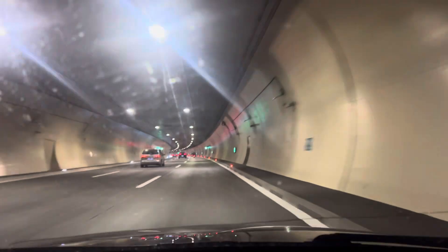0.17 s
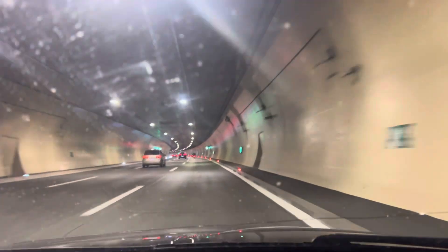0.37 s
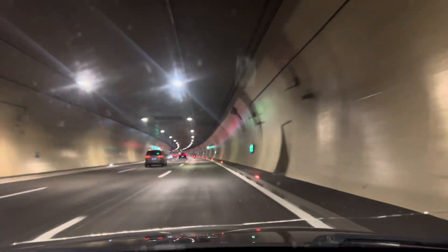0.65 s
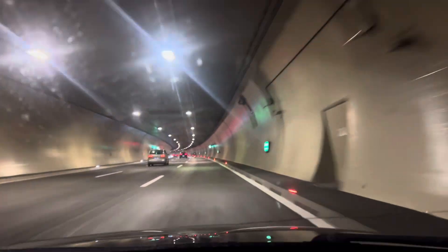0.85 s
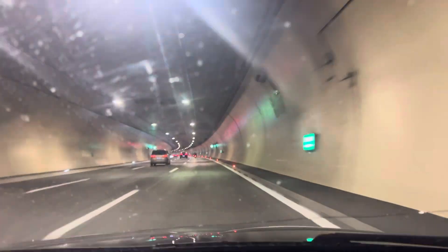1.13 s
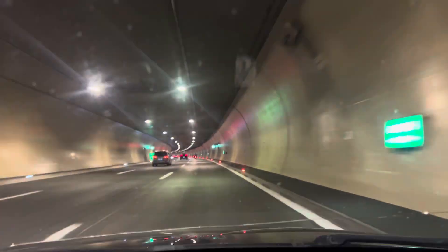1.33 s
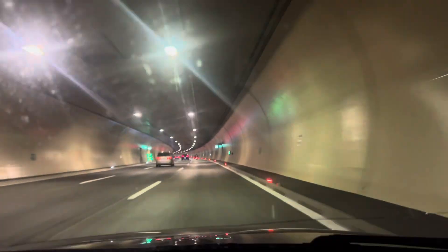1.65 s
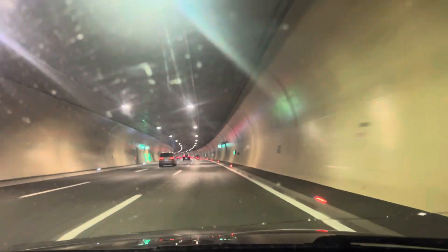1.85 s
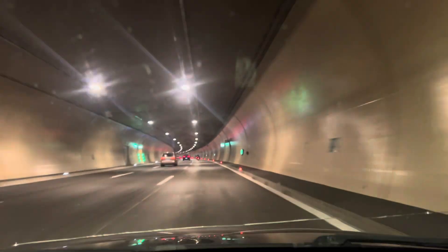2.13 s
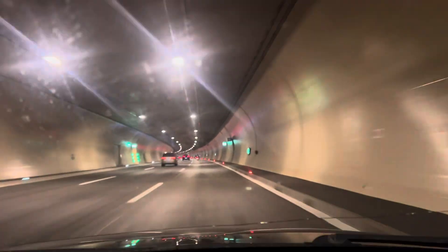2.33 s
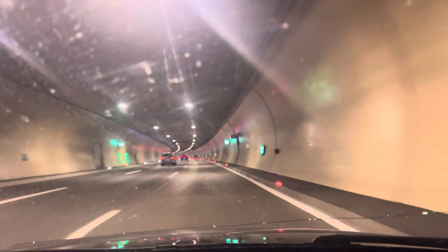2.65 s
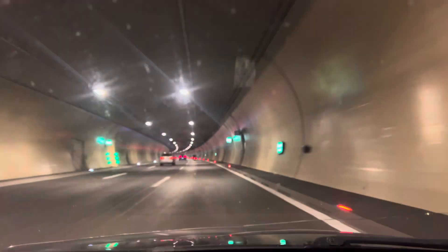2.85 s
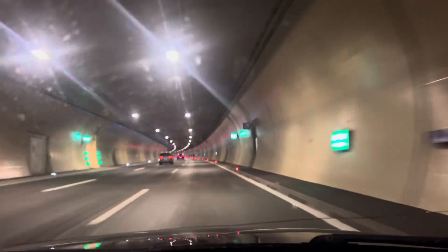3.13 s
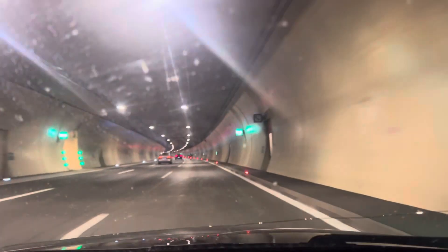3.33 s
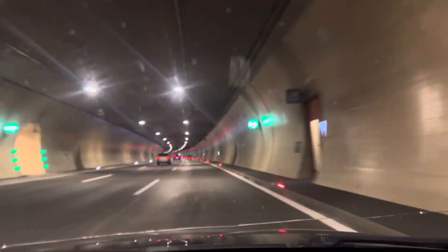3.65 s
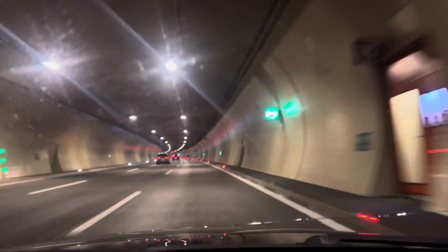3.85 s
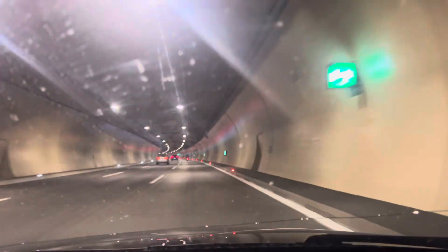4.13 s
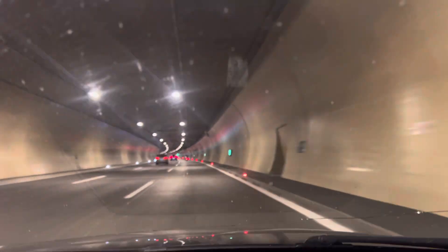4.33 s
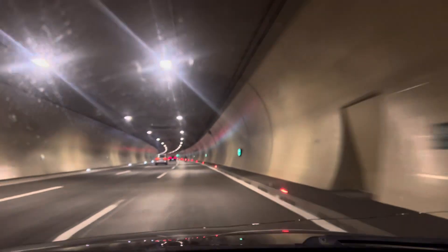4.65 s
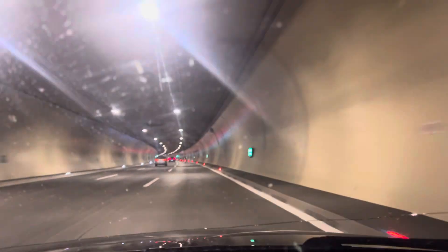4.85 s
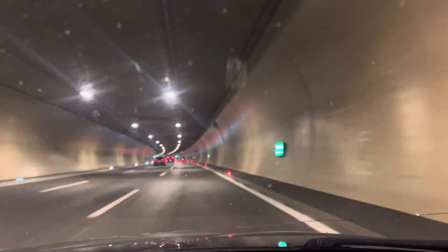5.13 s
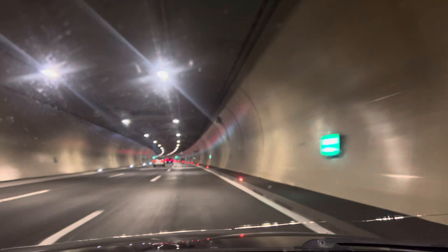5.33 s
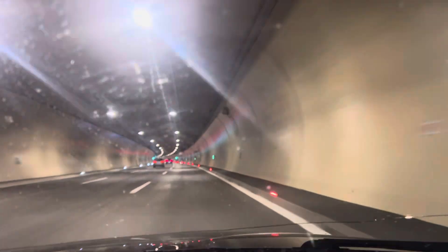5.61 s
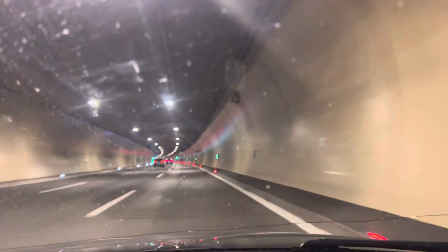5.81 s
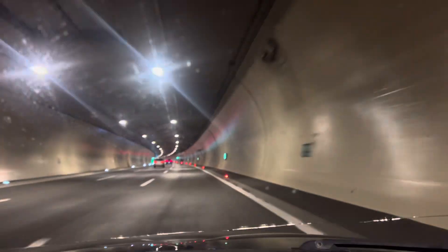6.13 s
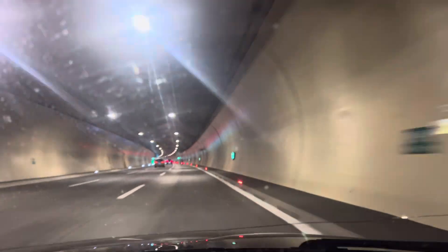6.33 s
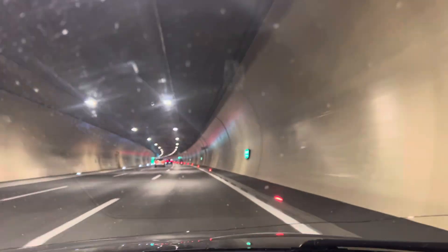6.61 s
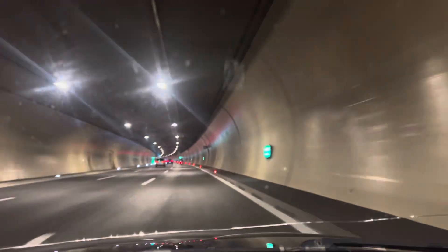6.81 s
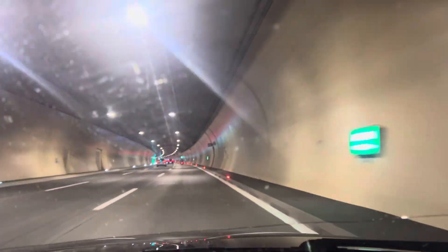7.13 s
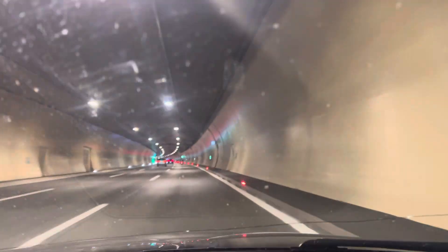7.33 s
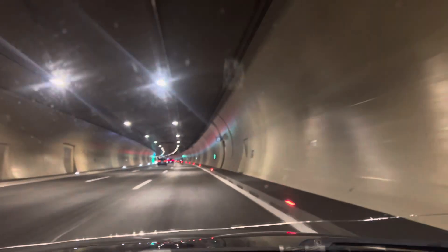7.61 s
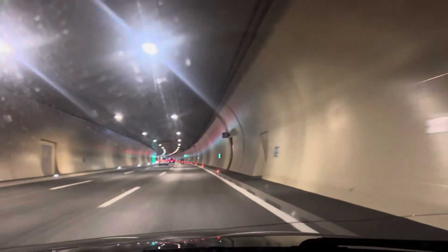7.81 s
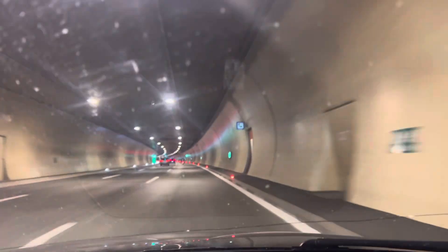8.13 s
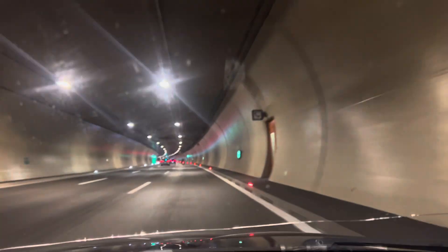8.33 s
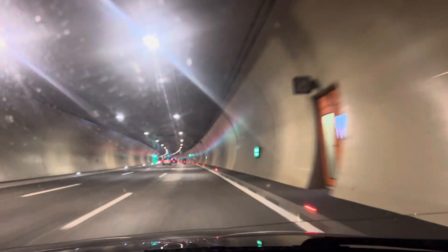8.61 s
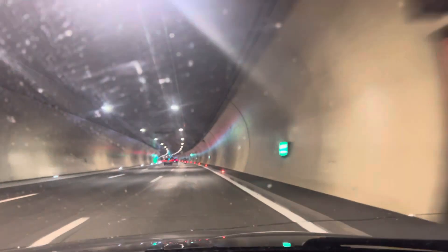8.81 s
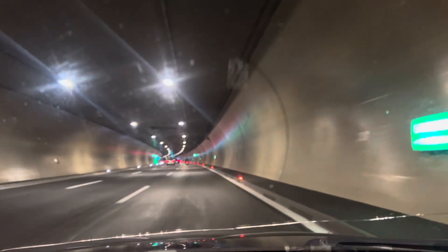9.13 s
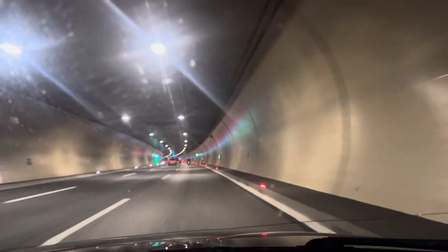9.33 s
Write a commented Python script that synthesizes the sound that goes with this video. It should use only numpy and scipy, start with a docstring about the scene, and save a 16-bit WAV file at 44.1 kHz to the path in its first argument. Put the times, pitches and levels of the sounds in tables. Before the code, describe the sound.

A continuous car interior rumble at cruising speed, close and boxy, dominated by deep humming boom. The road shakes it irregularly: dull double thumps, short floor growls, small swells. Tyre roar thrown back by tunnel walls sits behind as steady mid-range noise with a slightly wavering groove tone, and faint wind hiss at the window seals. The middle is smoother, with a few more bumps near the end; the speed barely changes.

```python
"""Car cruising through a long road tunnel

Heard from a phone behind the windscreen. Road shake is noise shaped into a low cabin drone, with sine orders
of wheels and engine humming in it; bumps are short decaying rings and rough strips are bursts of low growl.
Tread roar, thrown back by the tunnel walls, is resonant noise with a wavering groove tone.
Air along the window seals is a gusty high hiss."""
import sys
import numpy as np
from scipy import signal
from scipy.fft import rfft, irfft
from scipy.io import wavfile
from scipy.ndimage import uniform_filter1d, minimum_filter1d, map_coordinates

SR = 44100
rng = np.random.default_rng(int(sys.argv[2]) if len(sys.argv) > 2 else 0)


def wav_out(sig):
    """Save sig, one row per channel (or a flat mono array), as 16-bit PCM at SR to the path in sys.argv[1]."""
    wavfile.write(sys.argv[1], SR, np.round(np.clip(np.atleast_2d(sig).T, -1, 1) * 32767).astype(np.int16))


N = 417186  # length in samples

GEAR = 2.76  # crank turns per wheel turn


def undb(db):
    """Decibels to gain."""
    return 10 ** (np.asarray(db) / 20)


def bins():
    """Frequency of each spectral bin in Hz, kept at 1 or more for the logarithms."""
    return np.maximum(np.arange(N // 2 + 1) * SR / N, 1)


def across(table):
    """The columns of a frequency table, interpolated over log frequency to one value per bin."""
    hz, *columns = np.transpose(table)
    return [np.interp(np.log(bins()), np.log(hz), column) for column in columns]


def curve(table):
    """A timed table, one value per sample."""
    return np.interp(np.arange(N) / SR, *np.transpose(table))


def humps(times, sizes, half_s):
    """A bell-shaped change around each time, down to 1/e of its size half_s away from the middle."""
    t = np.arange(N) / SR
    return sum(size * np.exp(-((t - middle) / half_s) ** 2) for middle, size in zip(times, sizes))


def walk(rate):
    """Smooth random wander of spread 1 that moves about rate times a second."""
    spectrum = rfft(rng.standard_normal(N)) * np.exp(-(bins() / rate) ** 2)
    wander = irfft(spectrum, N)
    return wander / wander.std()


def colour(shape, resonances):
    """Gain per bin: a broad shape with steep skirts, lifted or dipped at each resonance."""
    skirt_db = -36  # fall per octave outside the range of the shape
    octaves_outside = np.abs(np.log2(bins() / np.clip(bins(), shape[0][0], shape[-1][0])))
    lifts = sum(db / (1 + (2 * (bins() - hz) / width) ** 2) for hz, width, db in resonances)
    return undb(across(shape)[0] + lifts + skirt_db * octaves_outside)


def cabin_noise(shape, resonances=()):
    """Coloured noise at both ports, their mean at rms 1; standing waves set likeness, lag and balance."""
    # cabin field at the two ports: frequency_hz, coherence (0-1), left_leads_rad, left_minus_right_db
    ports = [(40.0, 0.9, 1, -0.5), (138, 0.98, 0.03, -2.3), (178, 0.79, -1, 0), (264, 0.86, -0.14, 1.5),
             (357, 0.82, -0.7, -4.5), (447, 0, 3.5, 5.5), (546, 0.03, -1, -4), (653, 0.88, 3, -3),
             (880, 0.25, 2, -1), (1070, 0.46, 1, -2), (1690, 0.21, 0.25, -0.5), (2800.0, 0.03, 0, 0),
             (3900, 0.4, 1.5, 3.5), (5400.0, 0.03, 0, 9.5), (7200.0, 0.02, 0, 0)]
    likeness, lead, tilt_db = across(ports)
    likeness = np.clip(likeness, 0, 1)
    shared, own = rfft(rng.standard_normal((2, N)))
    partner = likeness * np.exp(-1j * lead) * shared + np.sqrt(1 - likeness ** 2) * own
    left_gain, right_gain = undb(tilt_db / 2), undb(-tilt_db / 2)
    # dividing by the size of the two ports' sum keeps the colour true in their mean
    centre = np.sqrt(left_gain ** 2 + right_gain ** 2 + 2 * likeness * np.cos(lead))
    spectra = np.array([left_gain * shared, right_gain * partner])
    noise = irfft(spectra * colour(shape, resonances) / centre, N)
    return noise / noise.mean(axis=0).std()


def steady(y):
    """Levels out slow swells to a running rms of 1; quicker throbs stay."""
    window_s = .25
    power = uniform_filter1d(y.mean(axis=0) ** 2, int(window_s * SR))
    return y / np.sqrt(power)


def orders(turn_hz, table, waver_db, slip):
    """Sines on whole and half multiples of a shaft speed, wavering in level and phase; rms 1."""
    angle = 2 * np.pi * np.cumsum(turn_hz) / SR
    y = 0
    for multiple, db in table:
        drift = slip * walk(.8) + rng.uniform(0, 2 * np.pi)  # rad
        size = undb(db + waver_db * walk(1.5))
        nearest_half = round(2 * multiple) / 2
        y = y + size * np.sin(nearest_half * angle + drift)
    return y / y.std()


def road_hum(wheel_hz):
    """Out-of-round tyres and engine shake through the mounts hum at multiples of their shaft speeds."""
    # out-of-round tyres: wheel_turn_multiple, relative_level_db
    wheel_orders = [(8, 0), (16, -23)]
    # how strongly the tyres hum in the drone: start_s, level_db
    tyre_hum = [(0, -5.5), (.75, -3), (1.8, -7), (2.5, -2.5), (3.3, -3.5), (4.1, 0), (4.9, -3), (5.8, -2.5),
                (6.8, -5), (8.1, -7), (9.0, -3), (9.46, -5.5)]
    # engine shake that comes through the mounts: crank_turn_multiple, relative_level_db
    mount_orders = [(2.5, -3), (3, -6.5), (3.5, -2), (4, -8.5)]
    mount_db = -5  # engine shake re drone noise
    tyres = orders(wheel_hz, wheel_orders, waver_db=1, slip=.2) * undb(curve(tyre_hum))
    mounts = orders(GEAR * wheel_hz, mount_orders, waver_db=2.5, slip=0.7) * undb(mount_db)
    return (tyres + mounts) * undb([[-.6], [.6]])  # a little stronger on the right


def road(wheel_hz, shake_db):
    """Road shake booms in the cabin with the hum in it; coarse asphalt rumbles in the floor."""
    # cabin boom under road shake: frequency_hz, relative_level_db
    drone_shape = [(68, -14), (85, -7), (98, -1), (110, -3.5), (124, 0), (139, 2.5), (153, -1.5),
                   (175, -7.5), (220, -18.5)]
    # floor panels and tyre cavities: frequency_hz, relative_level_db
    panels = [(150, -14), (186, 1.5), (235, -2.5), (262, -6.5), (288, -5), (315, -10), (345, -8.5),
              (362, -9), (400, -15), (450, -23.5)]
    # uneven patches in the road: middle_s, drone_lift_db, rumble_lift_db
    patches = [(.2, 1, 1.5), (.74, 5, -1.5), (1.19, 4.5, -1), (1.42, 3, 2), (2.24, 2, -2), (2.52, 0.5, 1),
               (2.74, 1.5, -0.5), (3.25, -1, 0), (3.58, 0.5, 2), (3.93, -0.5, 1), (4.36, 0, 0.5),
               (4.55, -1, 1), (4.82, 1.5, 3.5), (5.86, -1, -1), (8.52, 0, 2), (8.76, -2.5, 1.5),
               (9.04, 2, -0.5)]
    patch_s = 0.099  # from the middle of a patch to 1/e of its lift
    drone_db, smooth_road_db = 0.44, -18  # drone re road shake; shake on ordinary asphalt
    rumble_base_db, rumble_follow = -26.5, 0.11  # rumble on ordinary asphalt; dB per dB of extra shake
    drone = steady(cabin_noise(drone_shape) + road_hum(wheel_hz))
    rumble = steady(cabin_noise(panels))
    times, drone_lifts, rumble_lifts = np.transpose(patches)
    drone_level = drone_db + shake_db + humps(times, drone_lifts, patch_s)
    rumble_level = rumble_base_db + rumble_follow * (shake_db - smooth_road_db)
    rumble_level = rumble_level + humps(times, rumble_lifts, patch_s) + 0.28 * walk(5)
    return drone * undb(drone_level) + rumble * undb(rumble_level)


def bumps():
    """Each bump kicks the body through the suspension; it rings briefly, alike at both ports."""
    # bumps that thud: peak_s, peak_db, ring_hz
    thuds = [(0.024, -9.5, 115), (0.701, -9, 120), (1.139, -8.5, 116), (2.026, -4.5, 111),
             (2.215, -6, 128.5), (2.264, -5, 137), (2.352, -8, 127), (2.591, -9, 121), (2.758, -5.5, 126),
             (3.04, -7, 122), (3.259, -9, 126), (4.025, -6.5, 120), (4.135, -5, 118.3), (4.45, -9, 124),
             (4.709, -3.5, 125), (4.795, -9.5, 127), (4.959, -9, 137), (5.85, -13, 125), (6.015, -10, 128),
             (8.455, -8.5, 119), (8.54, -9, 120), (8.96, -9, 119), (9.056, -10, 129), (9.124, -10, 132)]
    rise_s, decay_s = .012, 0.015  # to 1/e of the peak, before and after it
    t, y = np.arange(N) / SR, 0
    phases = rng.uniform(0, 2 * np.pi, len(thuds))
    for (peak_s, db, hz), phase in zip(thuds, phases):
        since = t - peak_s
        envelope = np.exp(-(np.minimum(since, 0) / rise_s) ** 2 - np.maximum(since, 0) / decay_s)
        y = y + undb(db) * envelope * np.sin(2 * np.pi * hz * since + phase)
    return y


def strips():
    """The floor growls briefly as the tyres cross a rough strip: low noise under bell-shaped bursts."""
    # short rough strips: middle_s, level_db
    crossings = [(.48, -38), (1.04, -28), (1.69, -28), (1.83, -25.5), (2.22, -28), (2.361, -27.5),
                 (3.87, -28), (3.98, -22), (4.23, -25.5), (4.38, -27), (6.0, -27), (9.32, -29)]
    # their growl in the floor: frequency_hz, relative_level_db
    growl = [(180, 5.5), (260, 0.5), (360, -8), (450, -14.5), (560, -9.5), (700, -17.5)]
    strip_s = 0.045  # from the middle of a strip to 1/e of its growl
    times, db = np.transpose(crossings)
    return cabin_noise(growl) * humps(times, undb(db), strip_s)


def engine(wheel_hz):
    """The engine's low orders ride on the sway of the shell; the boom sinks and swells now and then."""
    # engine: crank_turn_multiple, relative_level_db
    engine_orders = [(1, -1), (1.5, -5)]
    # the shell swaying on its springs: frequency_hz, relative_level_db
    sway_shape = [(18, -26), (28, -20), (36, -5), (48, 2), (60, -2), (68, -6), (90, -7)]
    # the boom briefly sinks or swells: middle_s, change_db
    surges = [(.03, -4), (1.02, -6), (1.83, -4.5), (5.0, -5.5), (5.62, 3), (6.55, -6), (7.62, -5),
              (8.38, -4), (8.7, 2), (9.44, -4)]
    boom_db, sway_db = -22, -2.5  # hum and sway together; sway re hum
    surge_s = 0.14  # from the middle of a surge to 1/e of its change
    hum = orders(GEAR * wheel_hz, engine_orders, waver_db=1.5, slip=.3)
    sway = cabin_noise(sway_shape).mean(axis=0, keepdims=True)  # such long waves reach both ports alike
    boom = steady(hum + undb(sway_db) * sway)
    return boom * undb(boom_db + humps(*np.transpose(surges), surge_s))


def groove_song():
    """Air sings in the tread grooves: narrow noise read at a wandering pace, so its pitch wavers."""
    # the singing band: frequency_hz, relative_level_db
    groove_shape = [(1000, -13), (1038, 0), (1062, -1.5), (1100, -15)]
    wander = .024  # typical share by which the pitch drifts
    place = np.arange(N) + wander * np.cumsum(walk(3))
    ports = cabin_noise(groove_shape)
    return np.array([map_coordinates(port, [place], order=1, mode="mirror") for port in ports])


def tread(roar_db):
    """Tread blocks slap the road, smeared by the tunnel into a flickering roar; the grooves sing in it."""
    # tread roar through the glass: frequency_hz, relative_level_db
    roar_shape = [(280, -23.5), (420, -9), (680, -8), (850, -3), (1100, -0.3), (1350, -2), (1480, -8),
                  (1750, -7), (1920, -13.5), (2400, -17.5), (3200, -25.5), (4500, -46)]
    # resonances and dips of the roar in the cabin: frequency_hz, width_hz, lift_db
    glass = [(528, 27, 6.5), (599, 83, 5.5), (676, 87, -1), (730, 27, 4), (915, 80, 1), (1250, 56, -3.5),
             (1510, 90, -2.5), (1552, 70, 4), (1723, 81, 3), (2086, 60, 4), (2780, 130, 2), (2870, 120, -2)]
    groove_db = -10  # re tread roar
    grooves = groove_song() * undb(groove_db + 1.1 * walk(5.8))
    roar = cabin_noise(roar_shape, glass) * undb(0.5 * walk(23.0))
    return (roar + grooves) * undb(roar_db)


def air(hiss_db):
    """Turbulent air along the window seals: high noise in small quick gusts."""
    # hiss of the seals: frequency_hz, relative_level_db
    seals = [(2000, -5), (3000, 1.5), (4000, -1), (5500, -4), (6300, -10.5), (7200, -15.5), (8400, -16),
             (9300, -26), (11000, -33.5), (14000, -28)]
    return cabin_noise(seals) * undb(hiss_db + 0.42 * walk(9.8))


def scene():
    """Drives over the asphalt at cruising speed and mixes road, bumps, strips, engine, tread and air."""
    # cruising speed: start_s, wheel_turns_hz
    speed = [(0, 14.65), (2.5, 14.75), (5, 14.78), (7, 14.82), (9.46, 14.7)]
    # coarseness of the asphalt: start_s, road_shake_db
    surface = [(0, -16), (.5, -18.5), (2.0, -18.5), (2.5, -16), (3.3, -15.5), (4.3, -14.5), (5.3, -16.5),
               (5.8, -14.5), (6.3, -17), (7.4, -16), (8.2, -18), (9.46, -16.5)]
    # tread roar at the glass: start_s, level_db
    tread_level = [(0, -30.5), (1.5, -30), (2.6, -30.5), (3.95, -30.5), (4.7, -30.5), (5.8, -30.5),
                   (6.6, -31), (9.46, -30.7)]
    # airflow over the seals: start_s, hiss_db
    airflow = [(0, -52), (3.7, -50.5), (5.8, -53), (8.3, -53), (9.46, -50.5)]
    wheel_hz = curve(speed)
    asphalt = road(wheel_hz, curve(surface)) + bumps() + strips()
    return asphalt + engine(wheel_hz) + tread(curve(tread_level)) + air(curve(airflow))


def record(dry):
    """The phone fades in quickly, its limiter eases down the tallest peaks, and the top is cut."""
    ceiling, hold = .89, int(.02 * SR)  # full scale is 1; samples
    fade_s, top_hz = .005, 15500
    gain = ceiling / np.maximum(np.abs(dry).max(axis=0), ceiling)
    smooth_gain = uniform_filter1d(minimum_filter1d(gain, hold), hold)
    fade_in = np.minimum(np.arange(N) / (fade_s * SR), 1)
    low_pass = signal.ellip(8, .2, 70, top_hz, fs=SR, output="sos")
    return signal.sosfilt(low_pass, dry * smooth_gain * fade_in)


dry = scene()
out = record(dry)
wav_out(out)
```